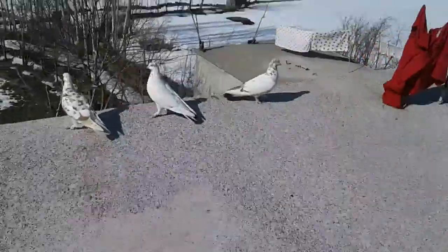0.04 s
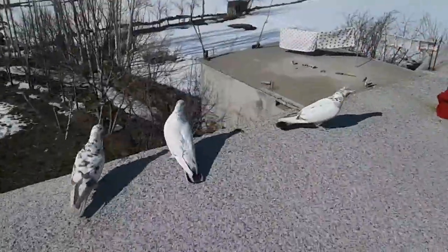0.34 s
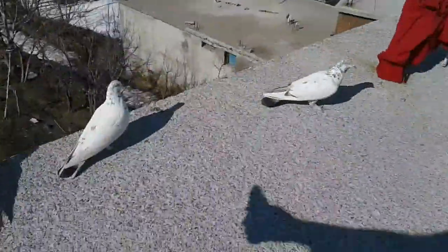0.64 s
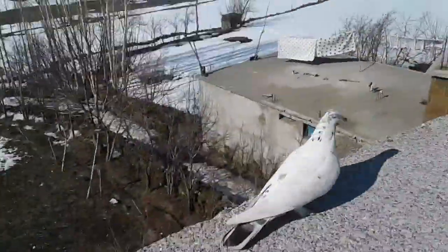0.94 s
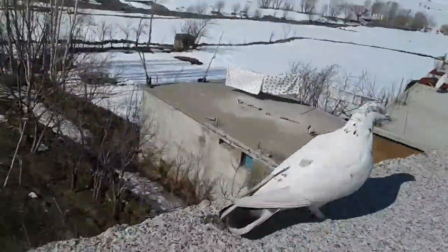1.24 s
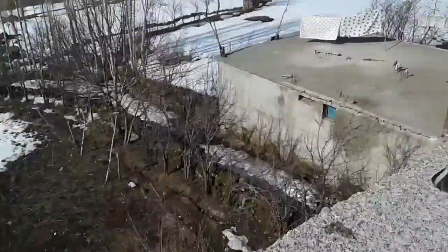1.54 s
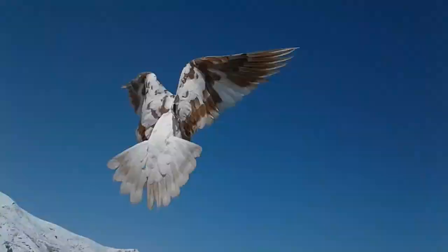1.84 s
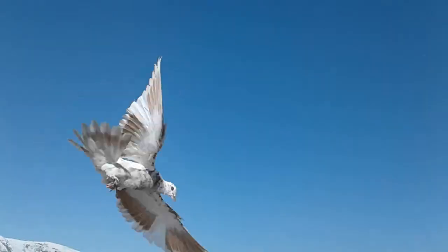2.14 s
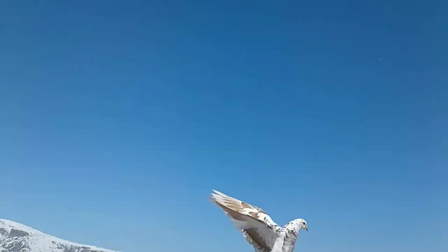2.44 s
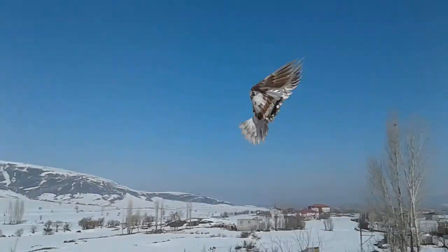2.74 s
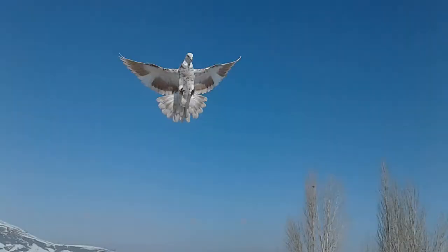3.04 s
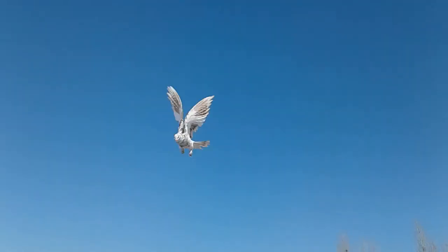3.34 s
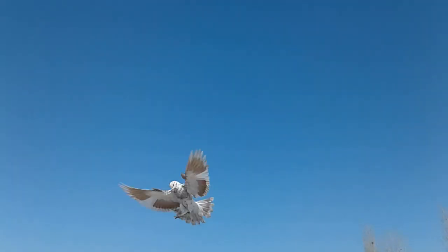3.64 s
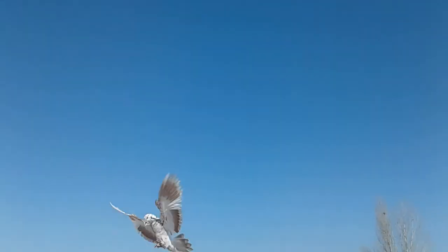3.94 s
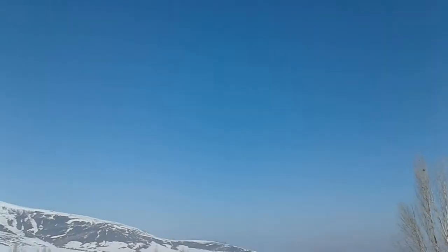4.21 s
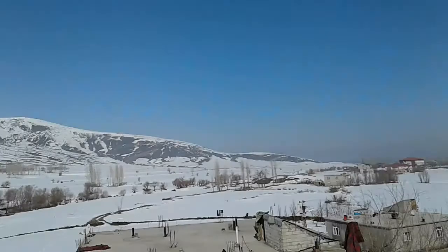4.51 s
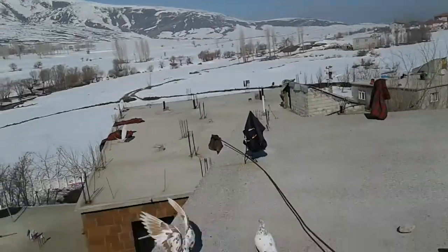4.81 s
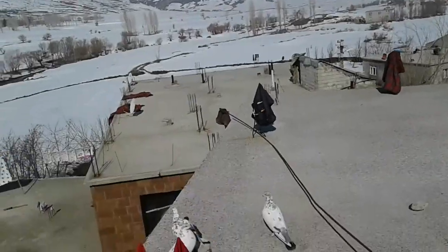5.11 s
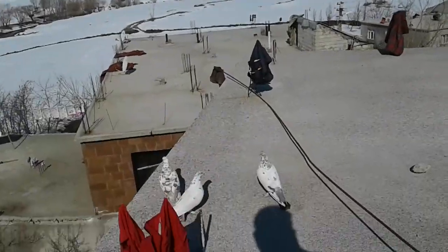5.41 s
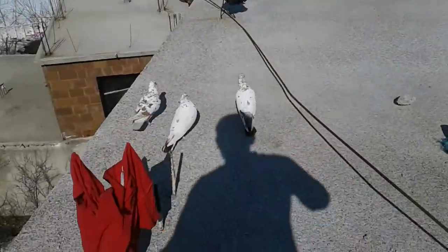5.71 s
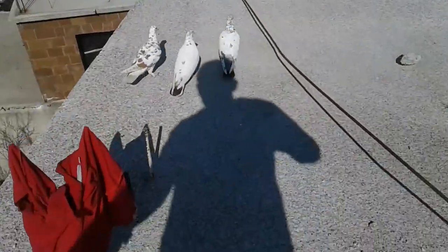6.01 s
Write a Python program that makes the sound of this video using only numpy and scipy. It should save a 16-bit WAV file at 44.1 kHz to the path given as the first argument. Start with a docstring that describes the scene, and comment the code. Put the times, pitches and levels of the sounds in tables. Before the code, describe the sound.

Feathers rustle and grit ticks as a pigeon moves about nearby on a rooftop. A hard blow right beside the microphone starts its flight, and dry, irregular wing claps follow, mixed with feather swishes and soft low gusts. While it flaps, a more distant rooster gives one hoarse crow ending in a long note. The claps stop, leaving soft rustling and a small bird twittering over the hush of open air.

```python
"""Feathers rustle and grit ticks as a pigeon scuffles close by, on a flat roof in quiet open air.
It strikes a hard blow beside the microphone and flies up, clapping its wings together in short runs;
between claps the feathers swish and puffs of air buffet the microphone. Down in the village a rooster
crows once, hoarse and then held, and comes back as a thin echo. Further off, small birds chirp
among hoarse calls and a faint drone."""
import sys
import numpy as np
from scipy import signal
from scipy.fft import rfft, irfft, next_fast_len
from scipy.io import wavfile
from scipy.ndimage import uniform_filter1d

SR = 44100
rng = np.random.default_rng(int(sys.argv[2]) if len(sys.argv) > 2 else 0)


def unload_wav(signal):
    """Save mono or channel-first audio to the path in sys.argv[1] as 16-bit WAV at rate SR, clipped to [-1, 1]."""
    wavfile.write(
        sys.argv[1],
        SR,
        np.round(np.clip(np.atleast_2d(signal).T, -1, 1) * 32767).astype(np.int16),
    )


N = 271901
TIME = np.arange(N) / SR

# wing claps, close: t/s, level/dB, tilt/(dB per octave), lag of the wing tips/s, air pocket f/Hz
WING_CLAPS = [(1.0369, -19, -3.5, 0.0082, 1220), (1.3455, -15, 1.5, 0.0109, 2120),
              (1.4258, -26.5, 1.5, 0.0026, 2060), (1.4791, -20.5, 1.5, 0.0019, 1360),
              (1.528, -18, 2.5, 0.00031, 5250), (1.594, -30, 3.5, 0.00224, 1230),
              (1.643, -25.5, 2.5, 0.0048, 1300), (1.708, -36.5, 4, 0.00436, 6060),
              (1.7578, -27.5, 1.5, 0.0019, 5640), (1.8773, -32.5, -1.5, 0.00452, 1390),
              (1.9925, -32.5, -2.5, .001, 1360), (2.0427, -21, 2, 0.0053, 1910),
              (2.1707, -37.5, 3, .007, 2980), (2.2329, -43, -1.5, 0.0024, 1500),
              (2.6608, -17.5, 3.5, .006, 2390), (2.783, -34, -1, 0.0038, 7000),
              (2.8393, -21.5, 1, 0.00097, 3770), (2.86, -32.5, 1, 0.00087, 4000),
              (2.921, -24.5, 3, .001, 3190), (3.007, -33.5, 0, 0.0039, 1520),
              (3.1219, -34.5, 3, 0.00375, 7550), (3.2866, -14.5, -.5, 0.0079, 3200),
              (3.571, -38, -1, .006, 7700), (4.048, -37.5, 8, .002, 2492), (4.104, -15, 3, 0.00592, 2030),
              (4.3781, -17.5, 5.5, .0025, 5520), (4.495, -25, 1.5, .0037, 1660),
              (4.6095, -20, 1, 0.0021, 5260), (4.727, -25, 3, 0.0026, 7900),
              (4.864, -33.5, 2.5, 0.00244, 3890)]
# spectrum of a clap before its tilt: f/Hz, level/dB
CLAP_SPECTRUM = [(60, -36), (200, -17.5), (500, -1.5), (1100, 2), (2400, -1.5), (4000, -3.5), (6500, -5),
                 (9000, -6), (12000, -18), (16000, -15)]


def undb(db):
    """Decibels to gain."""
    return 10 ** (np.asarray(db) / 20)


def unit(x):
    """Scale to rms 1."""
    return x / np.sqrt(np.mean(x ** 2) + 1e-18)


def burst(x, db):
    """Scale a short sound to the energy of 10 ms at the given level."""
    return x * undb(db) * np.sqrt(.01 * SR / np.sum(x ** 2))


def add(out, s, x):
    """Mix a short sound in at time s."""
    i = max(int(s * SR), 0)
    out[i:i + len(x)] += x[:max(N - i, 0)]


def gain_at(hz, points):
    """Gain at hz in a spectrum of (f/Hz, level/dB) points."""
    f, db = np.transpose(points)
    return undb(np.interp(np.log(np.maximum(hz, 1)), np.log(f), db))


def colour(x, points, tilt_db=0):
    """Causal filter with the given spectrum, tilted by tilt_db per octave about 2 kHz."""
    size = 2 * next_fast_len(len(x))
    hz = np.arange(size // 2 + 1) * SR / size
    octaves = np.log2(np.clip(hz, 300, 9000) / 2000)
    cepstrum = irfft(np.log(gain_at(hz, points) * undb(tilt_db * octaves)))
    cepstrum[1:size // 2] *= 2  # fold to minimum phase
    cepstrum[size // 2 + 1:] = 0
    return irfft(rfft(x, size) * np.exp(rfft(cepstrum)))[:len(x)]


def resonate(x, hz, width_hz):
    """One resonance."""
    return signal.lfilter(*signal.iirpeak(hz, hz / min(width_hz, SR / 3), fs=SR), x)


def noise_band(size, hz, width_hz):
    """Noise passed twice through one resonance."""
    return resonate(resonate(rng.standard_normal(size), hz, width_hz), hz, width_hz)


def walk(rate_hz, size=N):
    """Smooth random wander of spread 1."""
    hold = max(int(SR / rate_hz), 1)
    steps = np.repeat(rng.standard_normal(size // hold + 2), hold)
    return unit(uniform_filter1d(steps, hold))[:size]


def grainy(size, grain_db):
    """Noise that comes in tiny bursts, like feather vanes slipping over each other."""
    return rng.standard_normal(size) * undb(grain_db * walk(900, size))


def swell(half_s):
    """A bell-shaped rise and fall, and the time of its middle."""
    t = np.arange(int(6 * half_s * SR)) / SR
    middle = t[-1] / 2
    return np.exp(-.5 * ((t - middle) / half_s) ** 2), middle


def gate(start_s, length_s, edge_s):
    """Attack, hold and release, half open at the start and at the end."""
    return np.clip(.5 + np.minimum(TIME - start_s, start_s + length_s - TIME) / edge_s, 0, 1)


def outdoors(x, wet_db, t60_s):
    """The direct sound plus brief scatter from roofs and walls."""
    scatter = resonate(grainy(SR, 2.9), 1750, 2800) * undb(-60 * TIME[:SR] / t60_s)
    return x + undb(wet_db) * signal.fftconvolve(x, unit(scatter) / np.sqrt(SR))[:N]


def open_air(level_db=-49):
    """The hush all round the roof, wavering with the breeze."""
    # spectrum of the open air: f/Hz, level/dB
    spectrum = [(30, -29), (60, -14), (100, -10), (200, -9), (350, -2.5), (470, -4.5), (620, 0.5),
                (1200, -0.5), (1750, 3), (2800, -5.5), (3800, -4), (5000, -15), (9000, -13), (16000, -22.5)]
    breeze_db = 1.8 * walk(4.7)
    return unit(colour(rng.standard_normal(N), spectrum)) * undb(level_db + breeze_db)


def far_drone():
    """A faint, unsteady tone a long way off."""
    # course of the drone: t/s, f/Hz, level/dB
    course = [(0, 469.6, -54.5), (.7, 472, -55), (1.3, 472.4, -74), (6.17, 473.3, -64)]
    times, pitches, levels = np.transpose(course)
    gain = undb(np.interp(TIME, times, levels) + 2 * walk(25))
    hz = np.interp(TIME, times, pitches) * (1 + .0335 * walk(90))
    return gain * np.sin(2 * np.pi * np.cumsum(hz) / SR)


def far_calls(trim_db=-3.5):
    """Hoarse birds far off: soft-edged stretches of narrow noise."""
    # calls: middle t/s, level before trim/dB, half length/s
    calls = [(0.13, -43, 0.17), (0.907, -44, 0.19), (2.586, -45, 0.061), (3.077, -45, 0.086)]
    out = np.zeros(N)
    for s, db, half_s in calls:
        shape = np.exp(-((TIME - s) / half_s) ** 4)
        out += undb(db + trim_db) * shape * unit(noise_band(N, hz=1571, width_hz=560))
    return out


def chirp(hz, db, waver=.0085):
    """A small bird's pure note along a pitch line, fading in and out."""
    phase = 2 * np.pi * np.cumsum(hz * (1 + waver * walk(433, len(hz)))) / SR
    return undb(db) * np.sin(np.linspace(0, np.pi, len(hz))) * np.sin(phase)


def small_birds(whistle_s=.13, glide_s=.024, twitter_hz=7174, sag_hz_per_s=2300, pip_s=.058):
    """Some way off, one small bird whistles; later another twitters."""
    # whistles that drop quickly and level off: t/s, level/dB
    whistles = [(.056, -45.5), (0.445, -44), (0.853, -41.5)]
    # falling chirps, each starting lower than the last: t/s, length/s, end f/Hz, level/dB
    twitter = [(5.467, .023, 4240, -46), (5.534, .02, 5740, -45), (5.603, .02, 5805, -41),
               (5.68, 0.022, 5750, -37), (5.747, 0.0387, 5780, -38.5), (5.855, .033, 4850, -42),
               (5.971, 0.054, 4300, -43.5)]
    # slightly rising pips among the chirps: t/s, level/dB
    pips = [(5.425, -54), (5.665, -45), (5.915, -44)]
    out = np.zeros(N)
    drop = np.exp(-TIME[:int(whistle_s * SR)] / glide_s)
    whistle_hz = np.interp(drop, [0, 1], [3730, 5450])
    for s, db in whistles:
        add(out, s, chirp(whistle_hz, db))
    for s, length, end_hz, db in twitter:
        start_hz = twitter_hz - sag_hz_per_s * (s - twitter[0][0])
        add(out, s, chirp(np.linspace(start_hz, end_hz, int(length * SR)), db))
    for s, db in pips:
        add(out, s, chirp(np.linspace(3570, 3800, int(pip_s * SR)), db))
    return out


def crowing(base_hz=681.5, sag_hz=71.8, held_at_s=4.22, held_length_s=.8, edge_s=.02506):
    """Pitch, loudness and roughness of the crow: arched syllables run into the held note."""
    # opening syllables: t/s, length/s, pitch arch/Hz, relative level/dB, roughness (0 is clear)
    syllables = [(3.266, 0.16, 160, -42.5, 1), (3.576, 0.067, 220, -37, 1.1), (3.644, 0.082, 102, -32, .1),
                 (3.726, 0.0852, 0, -34, .4), (3.809, 0.2548, 112, -35, 1.01), (4.07, .16, 70, -39.5, 1.14)]
    held = gate(held_at_s, held_length_s, edge_s)
    spent = np.clip((TIME - held_at_s) / held_length_s, 0, 1)
    hz = base_hz - sag_hz * spent ** 3.6  # the held note sags ever faster
    loud = held * undb(-37.5 + 2.5 * spent)  # and swells a little
    rough = held * .23
    for s, length, arch_hz, db, roughness in syllables:
        sounding = gate(s, length, edge_s)
        from_middle = np.clip(2 * (TIME - s) / length - 1, -1, 1)
        hz += arch_hz * (1 - from_middle ** 2) ** .4
        loud += sounding * undb(db)
        rough += sounding * roughness
    return hz, loud, rough


def rooster(jitter=.0703, shimmer_db=2, split_db=-4, rasp_db=-2, unforced_db=-14, flutter_db=.9):
    """Down in the village: hoarse syllables, then a note that splits to half pitch, clears and sags."""
    # resonances of the throat: f/Hz, level/dB
    throat = [(350, -37), (560, -19), (670, -7.5), (780, -5), (1020, -4.5), (1170, -9.5), (1300, 0.5),
              (1380, -1), (1560, 0.5), (1750, -2.5), (2040, -15), (2380, -8), (2700, -26), (4000, -28),
              (6000, -53)]
    hz, loud, rough = crowing()
    split = gate(start_s=4.12, length_s=.62, edge_s=.13)
    wobble = 1 + jitter * rough * walk(420) + .0023 * walk(40)
    phase = 2 * np.pi * np.cumsum(hz * wobble) / SR
    voice = np.zeros(N)
    for k in range(1, 13):
        # alternate strong and weak cycles put lines halfway between the harmonics
        share = split * undb(split_db) if k % 2 else 1
        # the upper partials come out while the voice is forced
        effort = undb(unforced_db) + split if k > 5 else 1
        voice += share * effort * gain_at(hz * k / 2, throat) * np.sin(phase * k / 2)
    voice = unit(voice * undb(shimmer_db * rough * walk(300)))
    rasp = undb(rasp_db) * rough * unit(colour(rng.standard_normal(N), throat))
    return (voice + rasp) * loud * undb(flutter_db * walk(45))


def across_village(x, distance_db=-3, echo_s=.27, echo_db=-13):
    """A call carries up to the roof, then comes back thin from across the village."""
    out = outdoors(undb(distance_db) * x, wet_db=-13.5, t60_s=.24)
    add(out, echo_s, undb(echo_db) * resonate(out, hz=1340, width_hz=500))
    return out


def wingbeat(s):
    """The manner of the wingbeat at time s: slap, upstroke, downstroke, tilt, downwash."""
    # taking off, climbing, hovering, braking hard, settling: from t/s, slap against crack/dB,
    # upstroke/dB, downstroke/dB, swish tilt/(dB per octave), downwash/dB
    stages = [(1.0, -2.5, -37.5, -50, 1.5, -57), (1.69, -11, -48.5, -55, 5.5, -57.5),
              (2.8, -13.5, -46.5, -40.5, 1, -68), (4.0, -10.5, -43.5, -33, -0.5, -58.5),
              (4.7, -5, -38.5, -45, -2, -61.5)]
    return [manner for from_s, *manner in stages if from_s <= s][-1]


def puffs(downwash_half_s=.012, downwash_hz=120):
    """Eddies buffet the microphone with a low flutter; every clap sends a small one."""
    # stronger puffs: middle t/s, level/dB, half length/s, centre f/Hz
    eddies = [(0.397, -31.5, 0.0095, 259), (0.471, -40, .01, 282), (.789, -39.5, 0.0085, 229),
              (0.859, -33, .0065, 278), (0.908, -34.5, 0.0129, 136), (0.983, -42, 0.021, 166),
              (1.049, -29.5, 0.0074, 260), (1.799, -45, .021, 122), (2.11, -48, 0.0067, 157),
              (2.268, -38.5, .009, 360), (2.481, -55, 0.039, 140), (3.292, -43, .005, 169),
              (3.451, -52, .015, 221), (3.9, -63, .06, 114), (4.172, -46.5, 0.0066, 253),
              (4.848, -51, .008, 251)]
    downwash = [(s, wingbeat(s)[-1], downwash_half_s, downwash_hz) for s, *_ in WING_CLAPS]
    out = np.zeros(N)
    for s, db, half_s, hz in eddies + downwash:
        shape, middle = swell(half_s)
        eddy = unit(shape * noise_band(len(shape), hz, 1.405 * hz))
        add(out, s - middle, undb(db) * eddy * np.sqrt(np.mean(shape ** 2)))
    return out


def feathers(rest_db=-56.5, rustle_trim_db=-1, up_lead_s=.017, down_lag_s=.056):
    """Close by, each stroke drags the feathers through the air; a softer rustle runs in between."""
    # spectrum of sliding feathers: f/Hz, level/dB
    spectrum = [(80, -27), (250, -12.5), (600, 0), (1500, 2), (2800, -2.5), (5000, -5.5), (7500, -4),
                (9500, -10), (12000, -19), (16000, -16.5)]
    # bouts of rustling: middle t/s, level before trim/dB, half length/s
    rustles = [(0.237, -39.5, 0.24), (0.627, -45.5, 0.23), (0.938, -34, 0.11), (1.452, -48, 0.33),
               (2.55, -49.5, 0.756), (4.185, -38.5, 0.11), (4.677, -42.5, 0.21), (5.147, -52.5, .15),
               (5.82, -45, 0.29)]
    # single feather swishes between the claps: middle t/s, level/dB, half length/s
    swishes = [(.787, -31.5, 0.026), (1.118, -36.5, 0.0074), (1.295, -44.5, .012), (1.939, -41, 0.005),
               (2.27, -30.5, 0.0073), (2.338, -40, 0.0076), (2.383, -40, .019), (2.453, -34.5, 0.00602),
               (2.568, -39, 0.0206), (2.956, -39, .008), (3.463, -37.5, 0.018), (3.796, -43, 0.013),
               (3.967, -44, .012), (4.276, -33.5, 0.0158), (4.69, -33.5, .016), (5.556, -42.5, .02),
               (5.655, -45.5, .02)]
    bouts = [undb(db) * np.exp(-.5 * ((TIME - s) / half_s) ** 2) for s, db, half_s in rustles]
    stirring = np.sqrt(undb(rest_db) ** 2 + np.sum(np.square(bouts), axis=0))
    rustle = unit(colour(grainy(N, grain_db=3.2), spectrum, tilt_db=1.88))
    out = rustle * stirring * undb(rustle_trim_db + .67 * walk(35))

    def swish(s, db, half_s, tilt_db):
        shape, middle = swell(half_s)
        vanes = unit(colour(grainy(len(shape), grain_db=2.5), spectrum, tilt_db))
        add(out, s - middle, undb(db) * shape * vanes)

    for s, db, half_s in swishes:
        swish(s, db, half_s, tilt_db=-.46)
    for s, *_ in WING_CLAPS:
        _, up_db, down_db, tilt_db, _ = wingbeat(s)
        swish(s - up_lead_s, up_db, half_s=.011, tilt_db=tilt_db)
        swish(s + down_lag_s, down_db, half_s=.014, tilt_db=tilt_db)
    return out


def scuffles(tick_trim_db=-6.5, squeak_trim_db=2, lower_hz=7967, upper_hz=15150, attack_s=.00026):
    """On the roof near the microphone: dry ticks of grit and thin two-tone squeaks that die quickly."""
    # ticks and scuffs: t/s, level before trim/dB, centre f/Hz, decay/s
    ticks = [(.02, -30.5, 6360, 0.00256), (0.382, -22.5, 3420, 0.0092), (0.4667, -20.5, 5480, 0.0016),
             (0.4705, -20, 8000, 0.0003), (.639, -34, 2480, .002), (0.7153, -32, 7550, .001),
             (0.76, -34.5, 5900, 0.00116), (.78, -32, 2530, .004), (.788, -20.5, 2980, 0.0027),
             (.803, -28, 4000, 0.0017), (0.858, -27.5, 5600, 0.00285), (.9184, -15.5, 3220, 0.000595),
             (5.115, -37.5, 700, 0.0032), (5.593, -31.5, 480, 0.00494)]
    # squeaks: t/s, level before trim/dB, decay/s, upper tone against lower/dB
    squeaks = [(.286, -33, .0044, 9), (.307, -31, 0.0043, 5.5), (0.411, -31.5, 0.0151, 6),
               (.457, -25, .007, 4.5), (.485, -22.5, 0.00235, 4), (0.714, -23, 0.00313, -10.5),
               (1.085, -33.5, .012, -16.5), (1.125, -35, 0.04, -20), (1.155, -24.5, 0.019, -28)]
    out, t = np.zeros(N), TIME[:SR // 10]
    for s, db, hz, decay in ticks:
        grit = grainy(len(t), grain_db=7) * np.exp(-t / decay)
        add(out, s, burst(resonate(grit, hz, 1.27 * hz), db + tick_trim_db))
    for s, db, decay, upper_db in squeaks:
        phase_per_hz = 2 * np.pi * np.cumsum(1 + .0072 * walk(700, len(t))) / SR
        tones = np.sin(lower_hz * phase_per_hz) + undb(upper_db) * np.sin(upper_hz * phase_per_hz)
        shape = np.exp(-t / decay) * (1 - np.exp(-t / attack_s))
        add(out, s, undb(db + squeak_trim_db) * shape * tones)
    return out


def blow(at_s=1.0574, gain_db=5.5, crack_db=-6, crack_s=.0029):
    """One hard blow right beside the microphone: a dull knock under a short crack."""
    # modes of the knock: f/Hz, relative level/dB, decay/s
    modes = [(329, -8, 0.0034), (519.4, -2, 0.0036), (757.3, -10.5, 0.0051), (1120, -1, 0.00221),
             (2000, -2.5, 0.0017), (3100, -1.5, 0.00147)]
    out, t = np.zeros(N), TIME[:SR // 16]
    knock = sum((-1) ** k * undb(db) * np.exp(-t / decay) * np.sin(2 * np.pi * hz * t)
                for k, (hz, db, decay) in enumerate(modes))
    noise = unit(colour(rng.standard_normal(len(t)), CLAP_SPECTRUM, tilt_db=-4.5))
    crack = undb(crack_db) * noise * np.exp(-t / crack_s)
    add(out, at_s, undb(gain_db) * (knock + crack))
    return out


def claps(crack_s=.00078, tip_db=-5, slap_s=.00373, tail_db=-33, tail_s=.0067, pocket_db=2):
    """Close by, the wrists crack together, the feathers slap shut along the wing, then the tips meet."""
    out, t = np.zeros(N), TIME[:SR // 12]
    for s, db, tilt_db, tip_lag_s, pocket_hz in WING_CLAPS:
        slap_db, *_ = wingbeat(s)
        since_tips = np.maximum(t - abs(tip_lag_s), 0)
        wrists = np.exp(-t / crack_s)
        tips = undb(tip_db) * (since_tips > 0) * np.exp(-since_tips / crack_s)
        slap = undb(slap_db) * np.exp(-since_tips / slap_s) + undb(tail_db) * np.exp(-t / tail_s)
        shape = np.hypot(wrists + tips, slap)
        clap = colour(grainy(len(t), grain_db=1.6) * shape, CLAP_SPECTRUM, tilt_db)
        # air trapped between the wings rings briefly, at a new pitch for every clap
        pocket = undb(pocket_db) * resonate(clap, pocket_hz, .19 * pocket_hz)
        add(out, s, burst(clap + pocket, db))
    return out


def scene():
    """One microphone on the roof: the pigeon close and nearly dry, the other birds in more scatter."""
    pigeon = outdoors(claps() + blow() + scuffles() + feathers(), wet_db=-29, t60_s=.13)
    crow = across_village(rooster())
    birds = outdoors(far_calls() + small_birds(), wet_db=-8, t60_s=.15)
    return (far_drone() + open_air() + birds + crow + puffs() + pigeon)[None]


def record(dry, overload=.93, top_hz=15950):
    """The microphone overloads on the closest blow; the top is cut."""
    lowpass = signal.ellip(10, .2, 70, top_hz, fs=SR, output="sos")
    return signal.sosfilt(lowpass, np.clip(dry, -overload, overload))


dry = scene()
out = record(dry)
unload_wav(out)
```